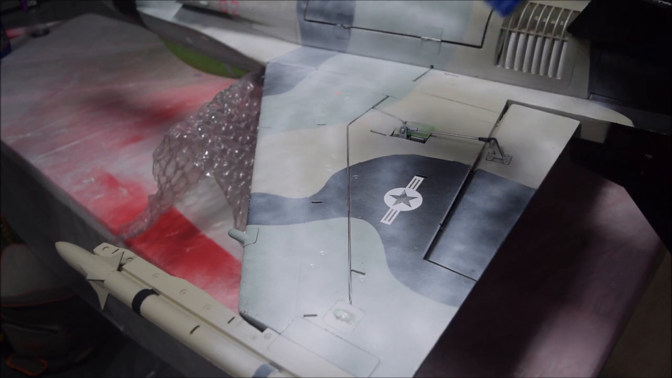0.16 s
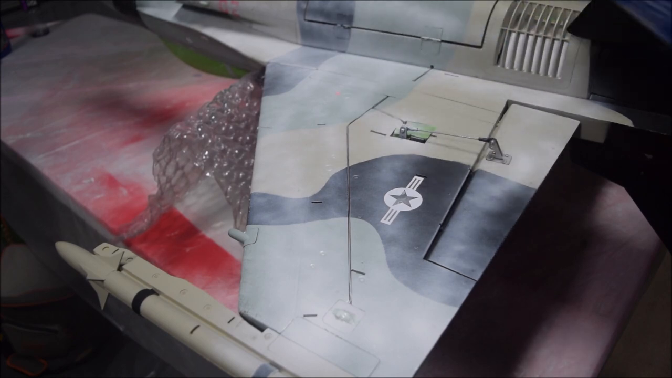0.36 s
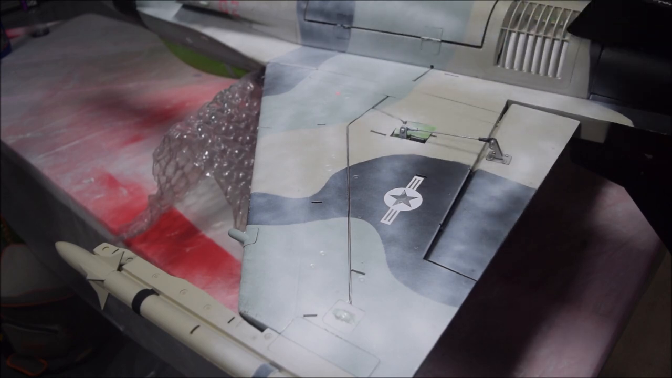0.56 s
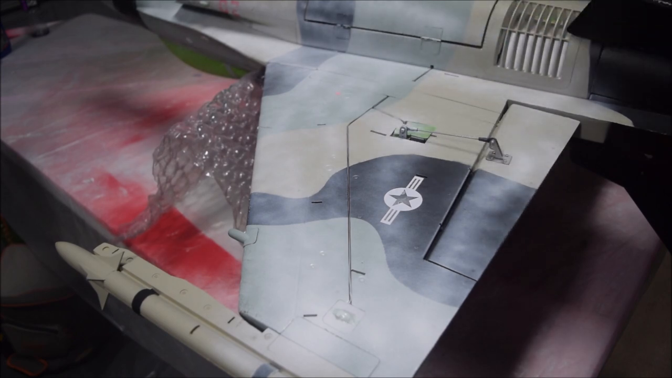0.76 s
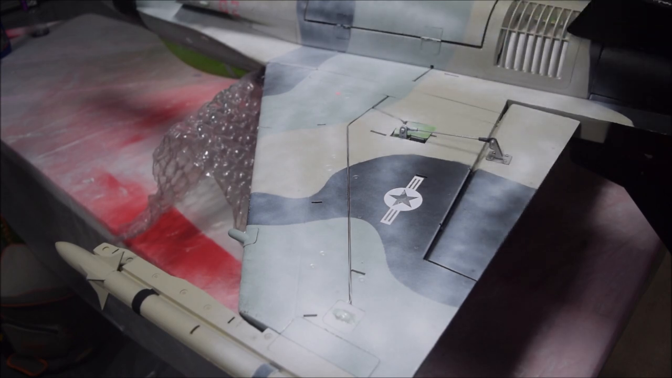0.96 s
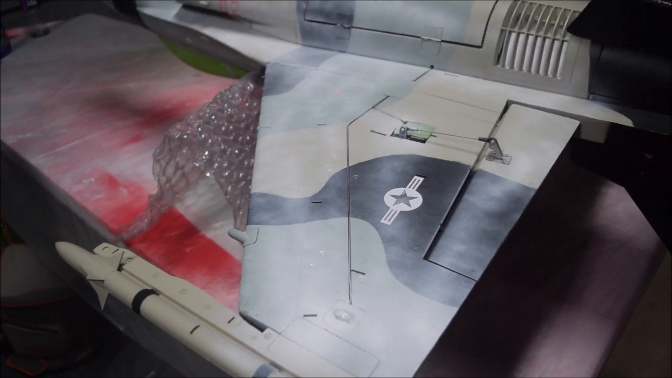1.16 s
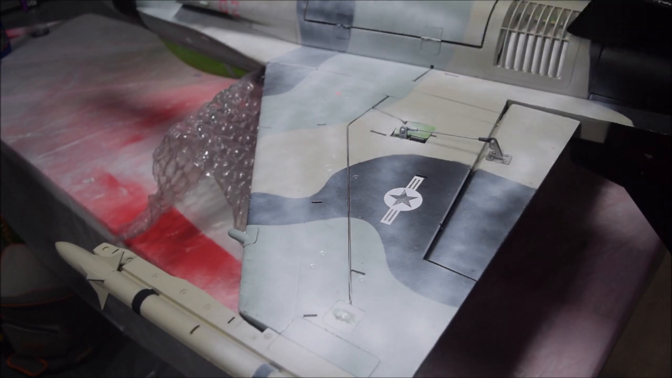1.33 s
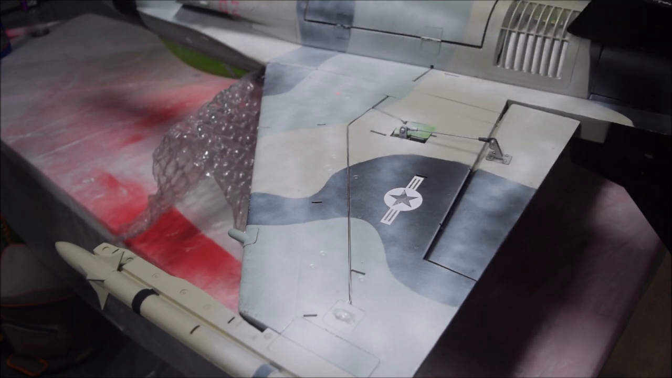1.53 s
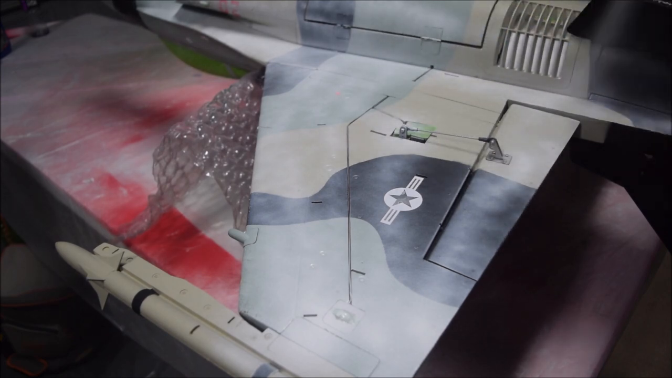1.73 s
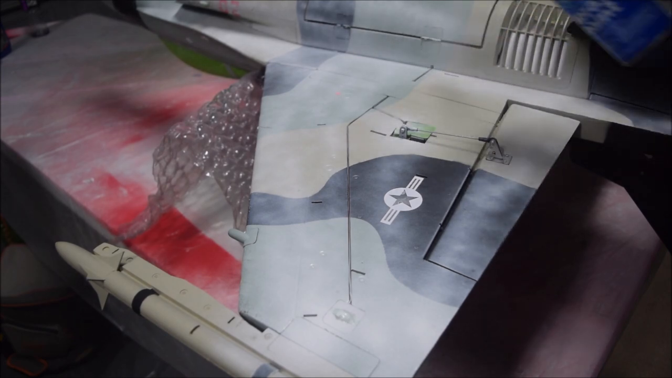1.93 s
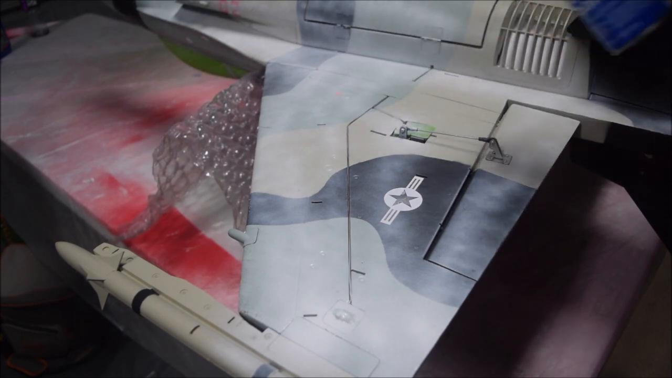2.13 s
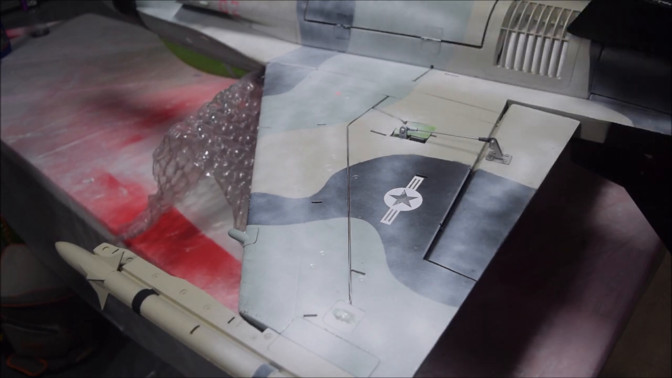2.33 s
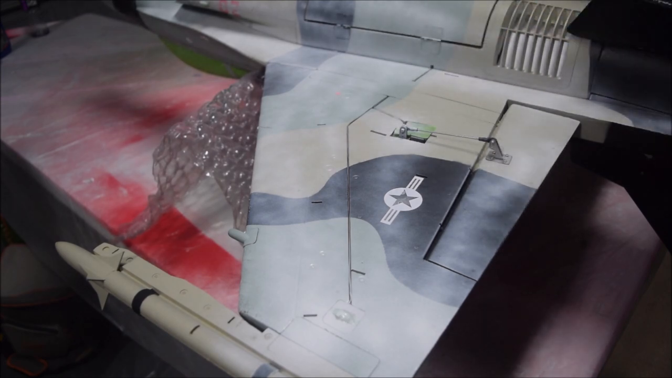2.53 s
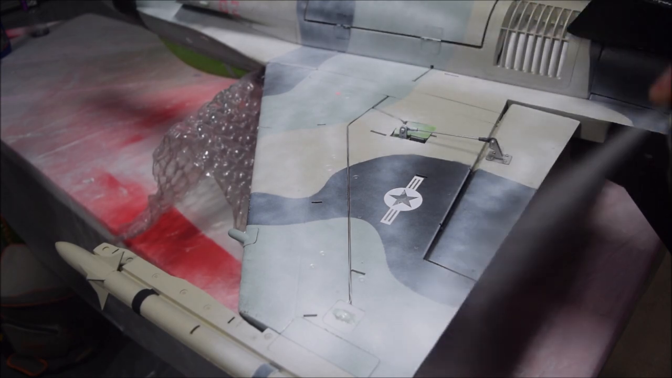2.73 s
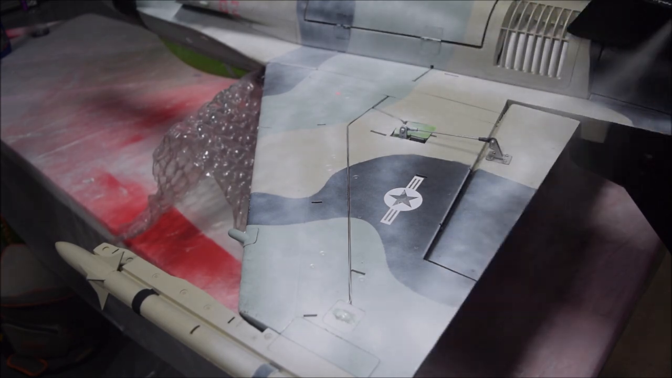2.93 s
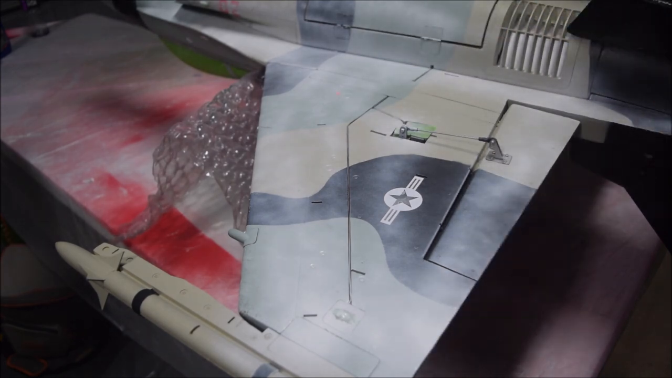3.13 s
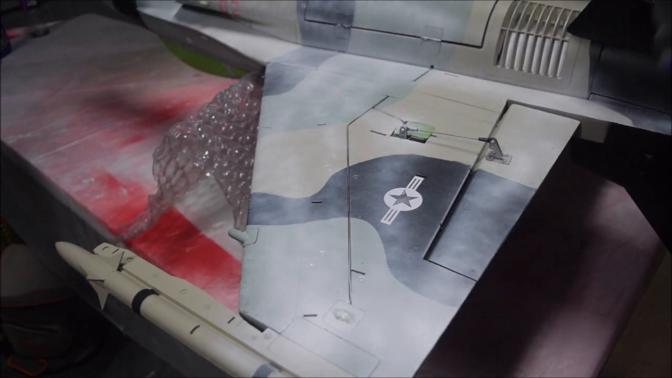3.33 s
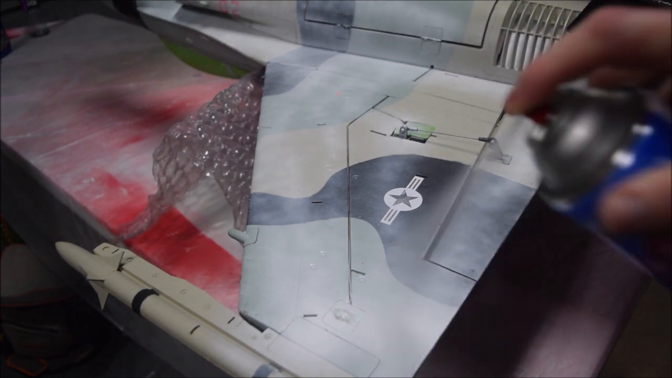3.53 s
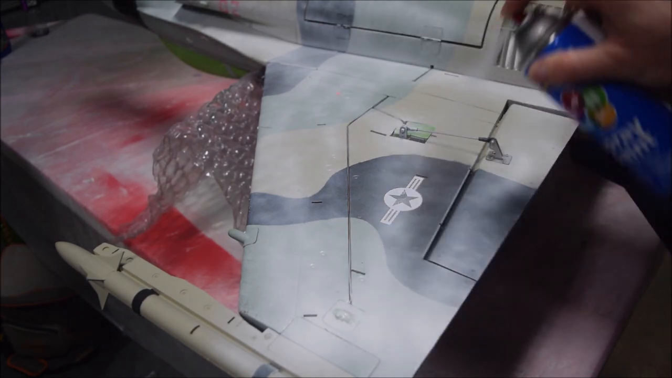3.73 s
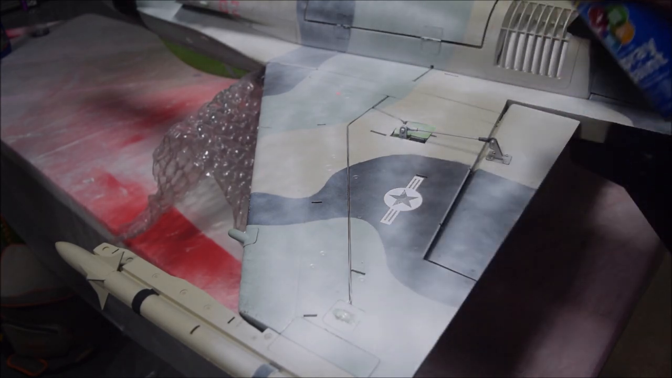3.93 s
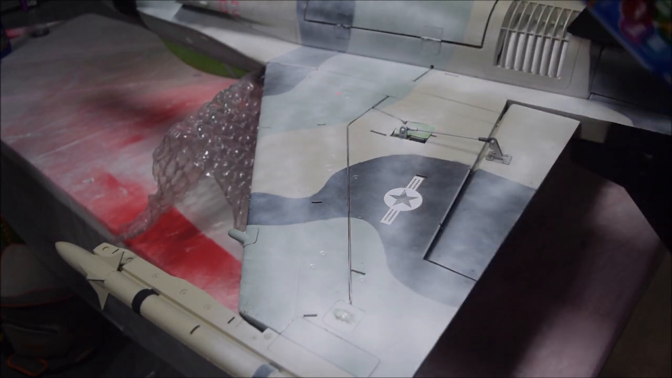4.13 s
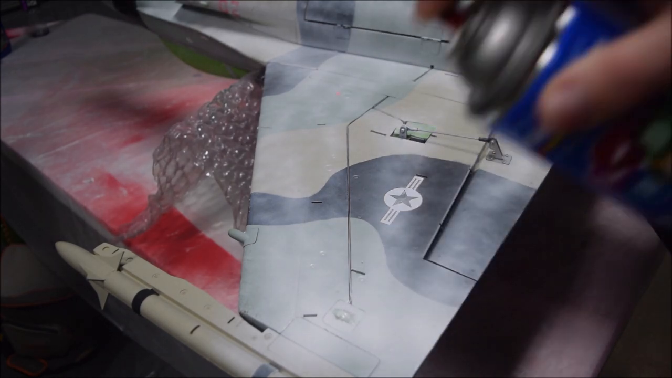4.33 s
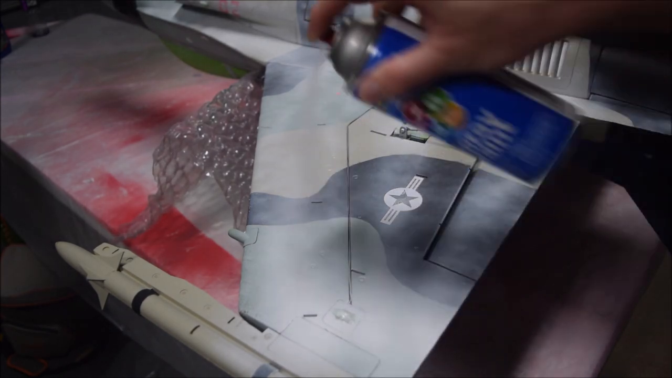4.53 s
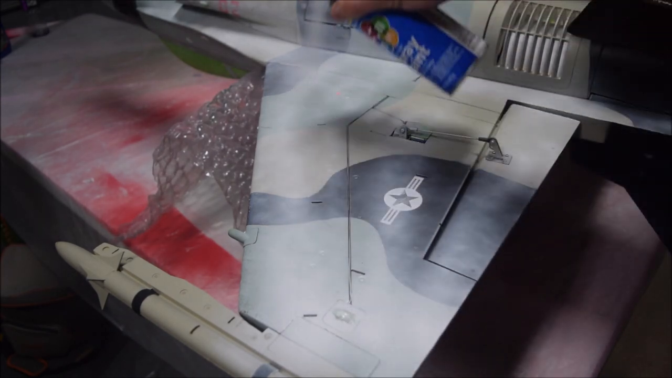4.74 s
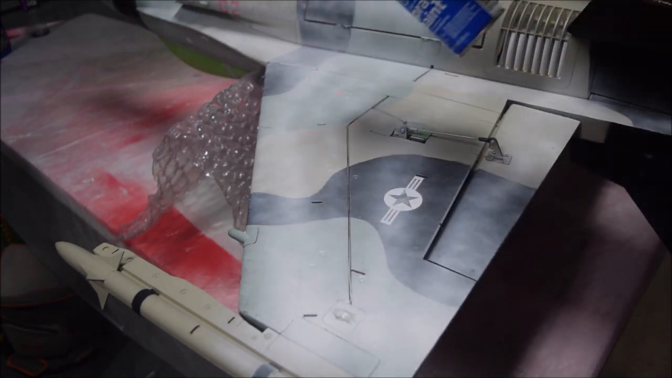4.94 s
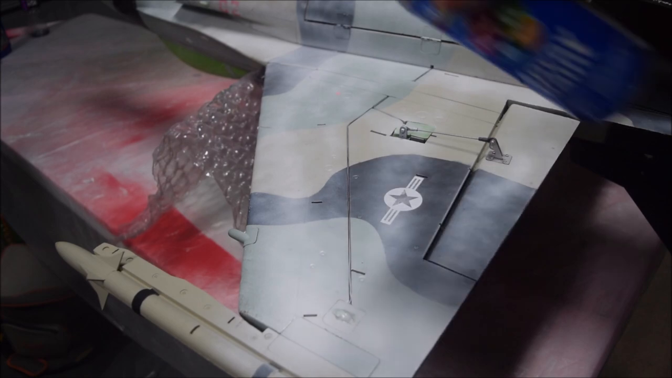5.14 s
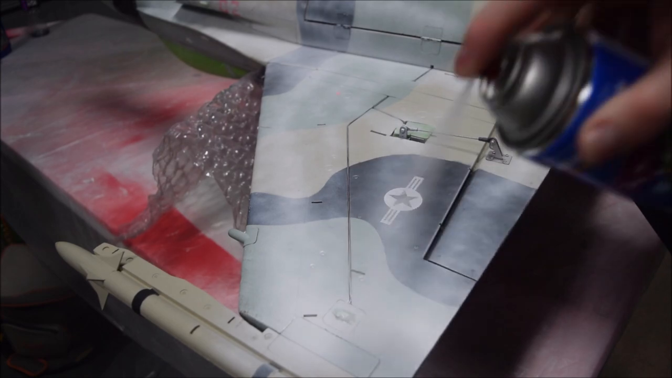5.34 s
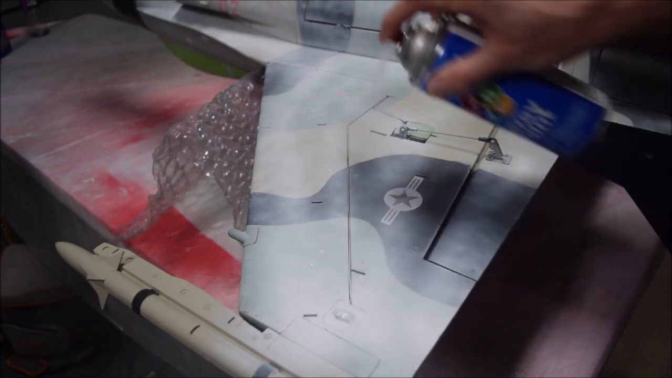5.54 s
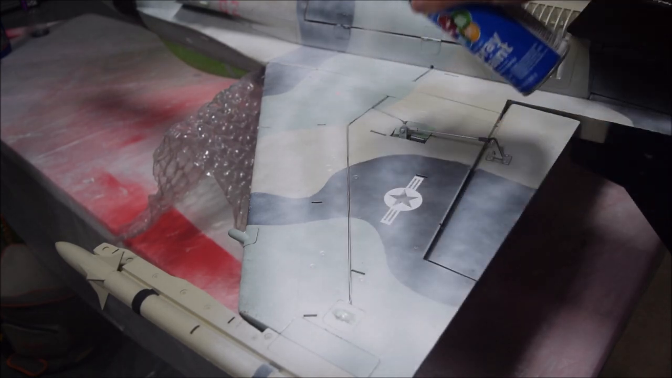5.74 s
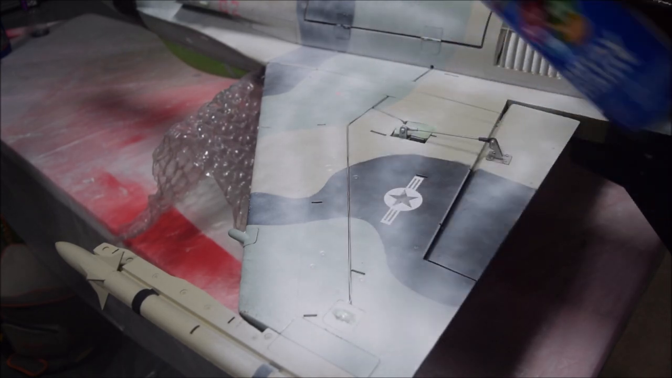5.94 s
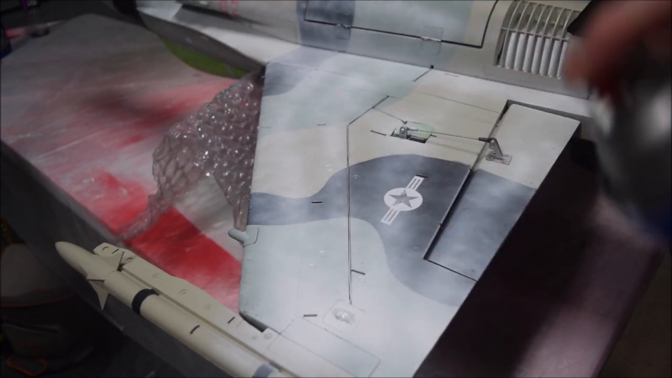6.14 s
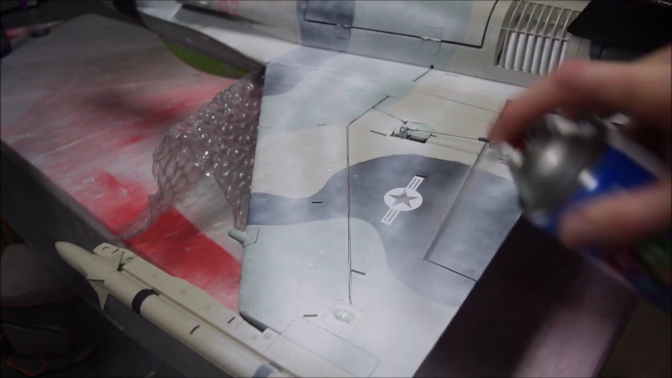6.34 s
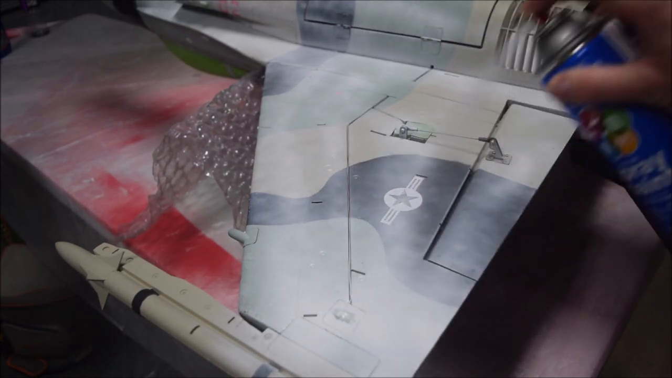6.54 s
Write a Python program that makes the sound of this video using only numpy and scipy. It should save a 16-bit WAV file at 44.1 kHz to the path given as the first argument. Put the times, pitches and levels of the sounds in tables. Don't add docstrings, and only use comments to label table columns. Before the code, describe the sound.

In a quiet indoor room with soft air noise, weak mains hum and a thin high insect-like buzz, a spray can's hiss is already under way and stops at 0.1 s. Until about 1.5 s, sleeve and shoe rub softly, with tiny glugs, barely audible high squeaks, a firm little knock near 0.85 and ball ticks around 1.4. A dry, smoother spray runs 1.5-2.07, followed by a light rub and ticks near 2.57. Wetter, spitting bursts run 2.6-3.1, 3.48-3.92, 4.37-4.9, 5.3-5.78 and 6.2-6.6, each opening with a soft pop, settling into bright fizz with a shifting panel reflection and dying into a short room tail. Metallic ball rattles cluster near 3.4, 4.2 and 4.7; the sharpest ticks come at 5.8, 6.2 and 6.5. Close stereo pickup.

```python
import sys
import numpy as np
from scipy import signal
from scipy.fft import rfft, irfft, next_fast_len
from scipy.io import wavfile
from scipy.ndimage import uniform_filter1d, map_coordinates

SR = 44100
rng = np.random.default_rng(int(sys.argv[2]) if len(sys.argv) > 2 else 0)


def nominal_scale(level):
    x = np.asarray(level, float) / 20
    return 10 ** x


def materialize(psi):
    bounded = np.clip(np.atleast_2d(psi).T, -1, 1)
    quanta = np.round(bounded * 32767).astype(np.int16)
    wavfile.write(sys.argv[1], SR, quanta)


N = 295029

# [f/Hz, density/dB per Hz]
AIR = [(15, -49), (30, -50), (60, -15), (150, -7.5), (430, -8), (860, -6), (1300, -7), (2200, -7.5),
       (3200, -12.5), (5200, -11.5), (7000, -20.5), (11000, -23), (13500, -32), (16000, -35)]
# [f/Hz, rms level/dB]
HUM = [(60, -89), (120, -86), (180, -77.5), (241, -68), (361, -72.5)]
# [f/Hz, width/Hz, level/dB, throbs/Hz]
INSECT = (6088, 342, -60.5, 48)
# [f/Hz, t60/s]
ROOM = [(300, 1), (1500, 0.71), (4000, 0.71), (9000, 0.51), (12500, 0.69), (14000, 0.31), (16000, 0.49)]
# [f/Hz, level/dB]
NEAR_SIDE = [(60, -26), (110, -43), (200, -63), (380, -67.5), (700, -43), (1290, -32), (2380, -19.5),
             (4400, -12.5), (8120, -1), (15000, -1.5)]
# [f/Hz, level/dB]
FAR_SIDE = [(60, -16), (110, -17), (200, -17), (380, -9.5), (700, -5.5), (1290, -5), (2380, -2.5),
            (4400, -3.5), (8120, -11), (15000, 6)]
# [f/Hz, level/dB]
PORT_LEAN = [(4000, -0.5), (8000, 1), (12000, -2.1), (15000, -1)]
# [low f/Hz, high f/Hz]
EDGES_HZ = (70, 15850)
# [loudest t/s, swell/s, fade/s, level/dB, treble above it/dB]
RUBS = [(.2, .08, 0.32, -49.5, -19), (.358, .012, .02, -53, -30), (.56, .07, 0.063, -48, -2.5),
        (.6, .2, 0.33, -47.5, -14), (.853, .008, 0.052, -41, -28), (.88, 0.049, 0.34, -44.5, -12),
        (1.09, 0.061, 0.012, -49, -6), (1.2, 0.019, 0.042, -53.5, -23), (1.236, .003, .006, -40, -20),
        (1.245, .01, 0.16, -53, -24), (1.41, .09, .2, -54, -11), (2.15, .02, 0.45, -50.5, -11.5),
        (2.32, 0.098, 0.33, -55.5, -20), (2.55, 0.21, 0.047, -50, -22)]
# [f/Hz, density/dB per Hz]
SCUFF = [(150, -20), (300, -4), (650, -7.5), (1150, -3.5), (1800, -6.5), (2130, -3), (2500, -10),
         (3800, -13), (6000, -27.5), (12000, -36)]
# [start t/s, length/s, first f/Hz, last f/Hz, level/dB]
SQUEAKS = [
    (0.392, .08, 11000, 12600, -74),
    (.57, .14, 14000, 12900, -76),
    (.7, .12, 13000, 12500, -75),
    (.8, .07, 12500, 14000, -78),
    (2.47, .07, 12500, 13100, -77),
]
KNOCK_S = [1.2262, 1.2303, .851, 1.088, 2.088, 2.5595, 3.3587, 3.366, 3.385, 4.205]
# [f/Hz, peak level/dB, t60/s]
KNOCKS = [
    [(300, -38, .012), (900, -40, .008)],
    [(150, -39.5, .03), (260, -35.5, 0.023), (443, -29, 0.025), (1040, -13, 0.007), (1200, -24.5, 0.013),
     (1650, -23, 0.013), (2450, -28, .009), (4300, -48, 0.012), (5700, -34, .006), (12000, -42, 0.0044)],
    [(1710, -29, 0.013), (3520, -42, 0.011)],
    [(3030, -39, .012), (7000, -52, .01)],
    [(4600, -38, .012)],
    [(9300, -49, 0.0065), (11660, -46, 0.0095)],
    [(11000, -32.5, 0.0045), (13000, -40, .004)],
    [(10500, -45, .004)],
    [(10500, -50, .004)],
    [(9000, -55.5, .02)],
]
# [t/s, peak level/dB, f/Hz, pitch rise factor, length/s]
GLUGS = [
    (0.193, -39, 550, 1.3, 0.0057),
    (0.198, -41, 1616, 1, 0.028),
    (0.355, -43.5, 675, 0.98, 0.0094),
    (0.547, -37.5, 640, 1.25, 0.03),
    (0.579, -53, 950, 0.86, 0.026),
    (3.275, -71, 1500, 1.05, .02),
]
# [f/Hz, level/dB, t60/s]
CAN = [(1297, -4.5, 0.082), (1640, -3, 0.035), (1990, -0.5, 0.055), (2200, 0.5, 0.045), (2440, -1, 0.058),
       (3270, -5, 0.062), (3596, 0, 0.043), (3880, 0, 0.024), (4230, 5.5, 0.022), (4655, 12, 0.015),
       (4800, -22, 0.018), (5150, -17, .03), (5200, -11, .03), (6540, -5.5, 0.027), (8670, -5, .015),
       (11400, -22, .012)]
# [loudest t/s, swell/s, fade/s, level/dB, mode rung most f/Hz]
ROLLS = [(1.42, 0.031, 0.044, -51, 2640), (.14, .05, .05, -51, 1500), (2.1, 0.061, .12, -46, 1450),
         (3.33, .07, .06, -55, 2200), (3.43, 0.1, .02, -47, 2440), (3.41, 0.04, .05, -44.5, 4000),
         (3.46, .04, .01, -44, 3550), (3.4, 0.018, 0.055, -65, 1350), (2.566, 0.014, 0.047, -47, 4200),
         (5.86, 0.054, 0.19, -53, 4600), (4.8, .03, .045, -38, 4200), (4.21, .04, .04, -53, 2300),
         (4.335, .03, .025, -57, 3600), (4.72, .07, 0.083, -36.5, 1900), (5.23, .03, .03, -58, 2420),
         (5.68, .14, .14, -42, 4800), (5.67, .09, .04, -42, 2200), (5.665, .06, .05, -34.5, 1640),
         (5.845, .04, .06, -43, 2440), (4.85, .08, 0.083, -43, 1640), (3.387, 0.00302, .02, -49, 2440),
         (5.9, .06, .14, -56, 1290), (6.55, 0.047, .03, -34.5, 2800)]
# [t/s, peak level/dB, mode hit hardest f/Hz, selectivity 0-1, crack level/dB]
TICKS = [(0.1987, -32.5, 1600, 0.3, -1), (1.398, -36.5, 2380, 0.3, -8), (1.4124, -36, 2390, 0.2, -5),
         (2.5593, -32.5, 4450, 0, -12), (2.586, -26, 4720, 0.1, -9), (3.3978, -33, 2130, 0.35, -8),
         (3.4072, -27, 2430, 0.3, -11), (3.4182, -33, 2450, 0.4, -3), (3.4278, -31, 2250, 0.3, -12),
         (4.2009, -37, 2270, 0.3, -9), (4.2084, -36.5, 2220, 0, -13), (4.713, -28, 1640, 1, -8),
         (5.233, -37, 2500, 0.2, -10), (5.656, -31, 1620, 0.5, -10), (5.6794, -32, 4480, 0.4, -8),
         (5.7895, -15.5, 4900, 0.6, -2.5), (5.812, -27.5, 1650, 1, -12), (5.824, -30, 2440, 0.7, -2),
         (5.8447, -24, 2410, 0.3, -6), (5.8874, -31, 4540, 0.4, -16), (6.191, -18.5, 5150, 0.8, -14),
         (6.503, -20, 2470, 0.2, -3), (6.536, -19.5, 2440, 0.36, -2), (6.549, -20, 3060, 0.2, -8)]
# [valve open t/s, valve closed t/s, fizz level/dB, spit of liquid in the nozzle/dB, roar above fizz/dB]
COATS = [
    (0.0, 0.103, -36, 2.5, -4.5),
    (1.509, 2.068, -38, 0.5, 1),
    (2.595, 3.11, -38.5, 11.5, 2),
    (3.475, 3.924, -38, 9.5, 1),
    (4.369, 4.899, -37, 9, -0.5),
    (5.309, 5.778, -37.5, 9, 1),
    (6.194, 6.601, -37.5, 9.5, 1.5),
]
# [valve rise/s, fall/s, whistle f/Hz, top fizz level/dB]
STROKES = [(0.0011, 0.014, 4700, -2), (0.021, 0.058, 5730, 2), (0.02, 0.018, 5050, 0.5),
           (0.02, 0.036, 5250, -1), (.015, 0.012, 5700, -1), (.023, 0.067, 5230, -1.5),
           (0.025, 0.029, 5200, -2.5)]
# [first delay/ms, last delay/ms, strength 0-1 reached mid-stroke]
ECHOES = [(.6, .55, .2), (.75, .55, .2), (.8, .6, .2), (.85, .5, .35), (.8, .45, .38), (.7, .44, .35),
          (.8, .5, .3)]
# [f/Hz, density/dB per Hz]
JET = [(120, -24), (300, -18), (600, -14.5), (1480, -2), (2800, 1.5), (3760, -1.5), (5200, -1.5),
       (7100, -9.5), (8800, -6.5), (10200, -9), (11900, -5.5), (13300, -10.5), (15300, -14), (16500, -28)]
JET_BANDS_HZ = [750, 1500, 3500, 6800, 9500, 12000]
# [crest f/Hz, spacing/Hz, depth/dB per dB of whistle]
CAP_RIPPLE = (8700, 3500, 0.12)

AIR_DB, ROOM_DB = -57.5, -7
ROLL_EDGE_DB, RUB_EDGE_DB = -15.5, -15.5
WHISTLE_WIDTH_HZ = 520
DRY_WHISTLE_DB, SPIT_S, SPIT_S_PER_DB = -2.5, 0.026, 0.02
TOP_PER_WHISTLE = -0.15
SURGE, SURGE_S = 0.25, 0.2
BUILD_DB, BUILD_S = -0.5, 0.0065
ROAR_SPIT, ROAR_SAG_DB_PER_S = 0.15, -4.5
PUFF_DB, POP_DB, POP_S = -14.5, 9.5, 0.031
CLOSE_S, CLOSE_FIZZ_DB, CLOSE_ROAR_DB, CLOSE_PUFF_DB = 0.026, -5.5, 0.5, 7.5


def evened(x):
    return x / np.sqrt(np.mean(x ** 2) + 1e-20)


def read(points, hz):
    f, value = np.transpose(points)
    return np.interp(np.log(hz + 1), np.log(f + 1), value)


def coloured(x, points):
    size = next_fast_len(x.shape[-1])
    gain = nominal_scale(read(points, np.fft.rfftfreq(size, 1 / SR)))
    return irfft(rfft(x, size) * gain, size)[..., :x.shape[-1]]


def add(mix, s, sound):
    part = mix[..., max(round(s * SR), 0):][..., :sound.shape[-1]]
    part += sound[..., :part.shape[-1]]


def wobble(length, span_s):
    span = max(int(span_s * SR), 1)
    once = uniform_filter1d(rng.standard_normal(length), span)
    return evened(uniform_filter1d(once, span))


def swell(rise, fade, edge_db):
    t = np.arange(-rise, fade, 1 / SR)
    gain = nominal_scale(edge_db * np.where(t < 0, -t / rise, t / fade))
    return gain * signal.windows.tukey(len(t), 0.1)


def ring(hz, t60, length_s, phase=0, rise_s=0.00022):
    t = np.arange(int(length_s * SR)) / SR
    return nominal_scale(-60 * t / t60) * np.sin(2 * np.pi * hz * t + phase) * np.minimum(t / rise_s, 1)


def band(x, hz, width):
    return signal.lfilter(*signal.iirpeak(hz, hz / width, SR), x)


def near_highpass(x):
    return signal.sosfilt(signal.butter(3, 2 * EDGES_HZ[0], "high", fs=SR, output="sos"), x)


def room_air():
    level = nominal_scale(AIR_DB + 0.48 * wobble(N, 0.063))
    return level * evened(coloured(rng.standard_normal((2, N)), AIR))


def mains_hum():
    t, hum = np.arange(N) / SR, np.zeros(N)
    for hz, db in HUM:
        level = np.sqrt(2) * nominal_scale(db + 1.2 * wobble(N, 0.15))
        hum += level * np.sin(2 * np.pi * hz * t + 0.5 * wobble(N, 0.63))
    return hum * np.array([[1], [0.7]])


def insects():
    hz, width, db, throb_hz = INSECT
    t = np.arange(N) / SR
    buzz = evened(band(band(rng.standard_normal((2, N)), hz, width), hz, width))
    throb_db = 0.5 * np.sin(2 * np.pi * throb_hz * t + 1.1 * wobble(N, 0.017))
    return buzz * nominal_scale(db + throb_db + 0.73 * wobble(N, 0.054))


def room(x):
    taps = np.zeros((6, SR))
    at = np.arange(200, SR - 20, 20) + rng.integers(0, 20, (6, (SR - 201) // 20))
    np.put_along_axis(taps, at, rng.choice([-1., 1.], at.shape), 1)
    hz, t, z = signal.stft(taps, SR, nperseg=256)
    decay = nominal_scale(-60 * t / read(ROOM, hz)[:, None])
    tail = signal.istft(z * decay, SR, nperseg=256)[1][:, :3 * SR // 4]
    turn = np.pi * (4.5 * np.arange(N) / SR + np.arange(3)[:, None] / 3)
    shares = np.tile(x * np.sqrt(2 / 3) * np.cos(turn), (2, 1))
    echoes = signal.fftconvolve(shares, tail / np.linalg.norm(tail[0]), axes=1)[:, :N]
    return echoes.reshape(2, 3, N).sum(1)


def shuffle():
    out = np.zeros(N)
    grain = rng.standard_normal((2, N)) * nominal_scale(wobble(N, 0.0046))
    scuff = evened(coloured(grain[0], SCUFF))
    treble_curve = [(2500, -24), (5000, 1.5), (9000, -9.5), (12500, -13), (14000, -24)]  # f/Hz, level/dB
    treble = evened(coloured(grain[1], treble_curve))
    for k, (s, rise, fade, db, treble_db) in enumerate(RUBS):
        shape, at = swell(rise, fade, RUB_EDGE_DB), k * SR // 3
        rub = (scuff + nominal_scale(treble_db) * treble)[at:at + len(shape)]
        add(out, s - rise, nominal_scale(db) * shape * rub)
    return out


def squeaks():
    out = np.zeros(N)
    for s, length, first_hz, last_hz, db in SQUEAKS:
        shape = swell(length / 2, length / 2, -7)
        jitter = 1 + 0.004 * wobble(SR // 2, 0.004)[:len(shape)]
        pitch = np.linspace(first_hz, last_hz, len(shape)) * jitter
        level = nominal_scale(db + 2.5 * wobble(SR // 2, 0.01)[:len(shape)])
        add(out, s, shape * level * np.sin(2 * np.pi * np.cumsum(pitch) / SR))
    return out


def knocks():
    out = np.zeros(N)
    for s, modes in zip(KNOCK_S, KNOCKS):
        for hz, db, t60 in modes:
            add(out, s, nominal_scale(db) * ring(hz, t60, 0.05, rise_s=min(1.2 / hz, 0.001)))
    return out


def glugs():
    out = np.zeros(N)
    for s, db, hz, rise, length in GLUGS:
        pitch = hz * np.geomspace(1, rise, int(length * SR))
        tone = np.sin(2 * np.pi * np.cumsum(pitch) / SR)
        add(out, s, nominal_scale(db) * np.hanning(len(pitch)) * tone)
    return out


def mode_shares(hz, selective):
    octaves = abs(np.log2(np.array(CAN)[:, 0] / hz))
    return -22 * np.clip(selective, 0, 1) * np.minimum(octaves * 3, 1)


def ball_rolls():
    out = np.zeros(N)
    for s, rise, fade, db, hz in ROLLS:
        shape = swell(rise, fade, ROLL_EDGE_DB)
        size = (len(CAN), 19000)
        taps = rng.standard_normal(size) * (rng.random(size) < 600 / SR)
        shares = mode_shares(hz, 0.9)
        modes = np.array([nominal_scale(d + e) * ring(f, 1.3 * t60, 0.08) for (f, d, t60), e in zip(CAN, shares)])
        rumble = signal.fftconvolve(taps, modes, axes=1).sum(0)
        rumble = evened(rumble[3000:3000 + len(shape)])
        add(out, s - rise, nominal_scale(db) * rumble * shape)
    return out


def ball_ticks():
    out = np.zeros(N)
    crack_band = signal.butter(2, (1500, 9500), "band", fs=SR, output="sos")
    crack_shape = ring(0, 0.018, 600 / SR, np.pi / 2, 0.0012)[:600]
    for s, db, hz, selective, crack_db in TICKS:
        chance, phases = rng.standard_normal((2, len(CAN)))
        shares = mode_shares(hz, selective) + 1.5 * chance
        tick = sum(nominal_scale(d + e) * ring(f, 0.6 * t60, 0.1, 2 * p, 0.0007)
                   for (f, d, t60), e, p in zip(CAN, shares, phases))
        add(out, s, nominal_scale(db) * tick / abs(tick).max())
        crack = signal.sosfilt(crack_band, rng.standard_normal(600))[:len(crack_shape)]
        add(out, s, nominal_scale(db + crack_db) * crack * crack_shape)
    return out


def nozzle_flow(t, opened, closed, fizz_db, spit_db, roar_db):
    age = np.maximum(t - opened, 0)
    opens = opened > 0
    spit = spit_db * np.exp(-(age / (SPIT_S + SPIT_S_PER_DB * abs(spit_db))) ** 1.33)
    closing = np.clip(1 - (closed - t) / CLOSE_S, 0, 1)
    build = BUILD_DB * np.exp(-age / BUILD_S) * opens
    fizz = fizz_db + SURGE * spit_db * np.exp(-age / SURGE_S) + build + CLOSE_FIZZ_DB * closing
    sag = ROAR_SAG_DB_PER_S * (t - (opened + closed) / 2)
    roar = roar_db + ROAR_SPIT * spit + sag + CLOSE_ROAR_DB * closing - build
    puff = PUFF_DB + POP_DB * np.exp(-age / POP_S) * opens + CLOSE_PUFF_DB * closing
    return fizz, roar, DRY_WHISTLE_DB + spit, puff


def jet_balance(hz, roar, whistle, puff, whistle_hz, top_db):
    crest_hz, spacing_hz, depth = CAP_RIPPLE
    top = top_db + TOP_PER_WHISTLE * whistle
    lean = np.array([np.interp(hz, JET_BANDS_HZ, [p, r, r, 0, 0, e]) for p, r, e in zip(puff, roar, top)]).T
    hz = hz[:, None]
    bump = np.exp(-((hz - whistle_hz) / WHISTLE_WIDTH_HZ) ** 2 / 2)
    lean += bump * (1.49 * whistle - lean)
    ripple = np.cos(2 * np.pi * (hz - crest_hz) / spacing_hz)
    return lean + (hz > 6200) * depth * whistle * ripple


def panel_echo(jet, first_ms, last_ms, strength):
    count = jet.shape[1]
    late = np.arange(count) - np.geomspace(first_ms, last_ms, count) * SR / 1000
    echoed = np.array([map_coordinates(take, [late], order=3) for take in jet])
    echoed = coloured(echoed, [(2500, -14), (5500, 0), (10500, 0), (14000, -8)])
    return strength * np.minimum(np.linspace(0.2, 2, count), 1) * echoed


def spray_coat(row, stroke, panel):
    rise, fall, whistle_hz, top_db = stroke
    start = row[0] - rise
    t = np.arange(start, row[1] + fall, 1 / SR)
    fizz_db, _, wet_whistle, _ = nozzle_flow(t, *row)
    steady = evened(coloured(rng.standard_normal((2, 3 * SR // 4)), JET))
    hz, frame_s, z = signal.stft(steady, SR, nperseg=512, noverlap=384)
    _, roar, whistle, puff = nozzle_flow(frame_s + start, *row)
    lean = jet_balance(hz, roar - 3, whistle - 1, puff + 12, whistle_hz, top_db)
    patches = uniform_filter1d(rng.standard_normal(lean.shape), 7, 0)
    patches = evened(uniform_filter1d(patches, 24, 1))
    jet = signal.istft(z * nominal_scale(lean + 0.9 * patches), SR, nperseg=512, noverlap=384)[1][:, :len(t)]
    sputter = np.clip(wet_whistle / 9, 0.25, 1)
    droplets = 1.2 * wobble(SR, 0.00079) + 0.47 * wobble(SR, 0.0021)
    spatter = nominal_scale(sputter * droplets[:len(t)])
    valve = np.clip((t - start) / rise, 0, 1) ** 2 * np.clip((t[-1] - t) / fall, 0, 1)
    jet = jet * spatter * valve * nominal_scale(fizz_db + 5)
    return start, jet + panel_echo(jet, *panel)


def scene():
    far = room_air() + mains_hum() + insects()
    small = near_highpass(shuffle() + squeaks() + knocks() + glugs() + ball_rolls() + ball_ticks())
    spray = np.zeros((2, N))
    for row, stroke, panel in zip(COATS, STROKES, ECHOES):
        add(spray, *spray_coat(row, stroke, panel))
    spray = near_highpass(spray)
    quadrature = signal.hilbert(spray[0], next_fast_len(N))[:N].imag
    spray[1] = 0.55 * spray[1] + 0.37 * quadrature
    wet = nominal_scale(ROOM_DB) * room(spray[0] + 0.93 * small)
    before = nominal_scale(-42) * evened(coloured(rng.standard_normal(SR // 4), JET))
    wet[:, :SR // 4] += before * nominal_scale(-110 * np.arange(SR // 4) / SR + 1)
    near = spray + wet + small * np.array([[1], [0.3]])
    mid = near[0] + far[0]
    side = coloured(near[1], NEAR_SIDE) + coloured(far[1], FAR_SIDE)
    return np.array([mid + side, mid - side])


def band_limit(x):
    return signal.sosfilt(signal.butter(12, 16940, fs=SR, output="sos"), x)


def record(dry):
    leaned = np.array([coloured(port, [(hz, way * db / 2) for hz, db in PORT_LEAN])
                       for port, way in zip(dry, (1, -1))])
    lowpass = signal.firwin(401, EDGES_HZ[1], window=("kaiser", 9), fs=SR)
    limited = signal.oaconvolve(leaned, lowpass[None], "same")
    return band_limit(limited)


dry = scene()
out = record(dry)
materialize(out)
```